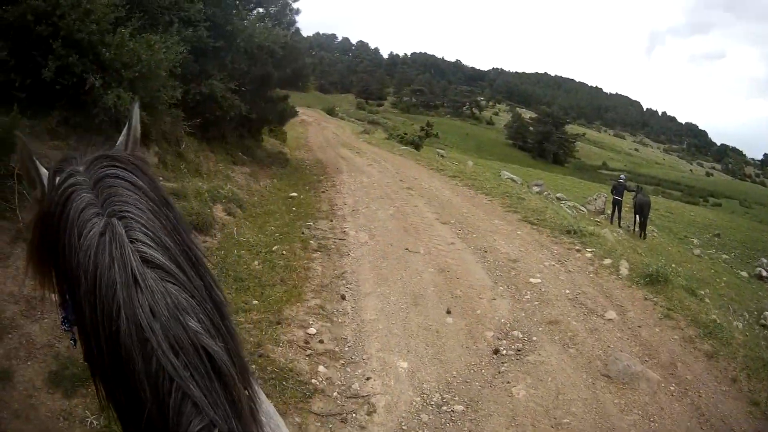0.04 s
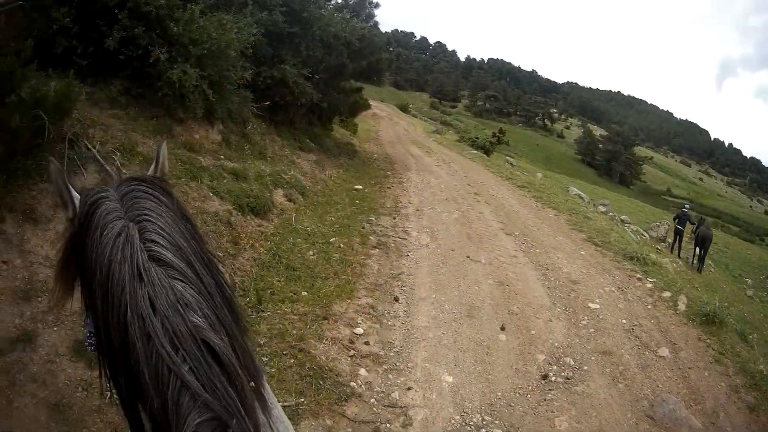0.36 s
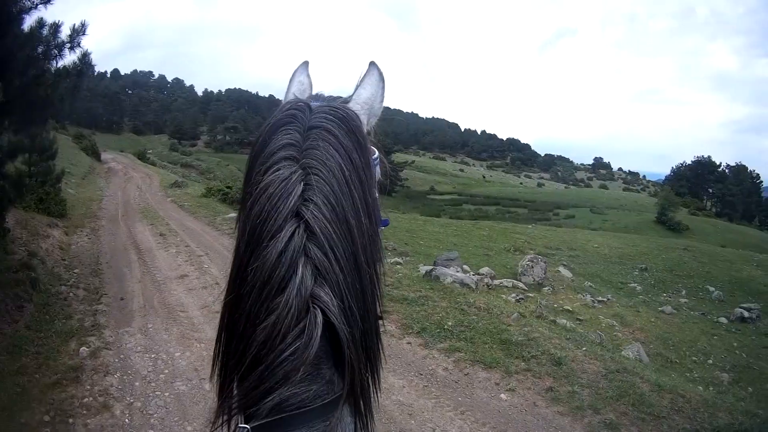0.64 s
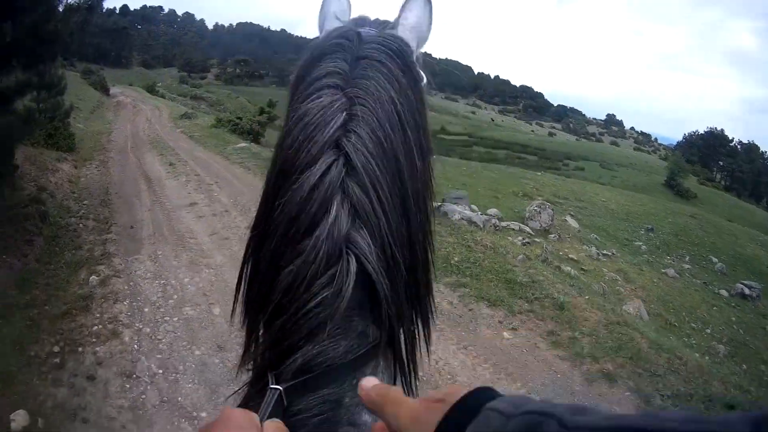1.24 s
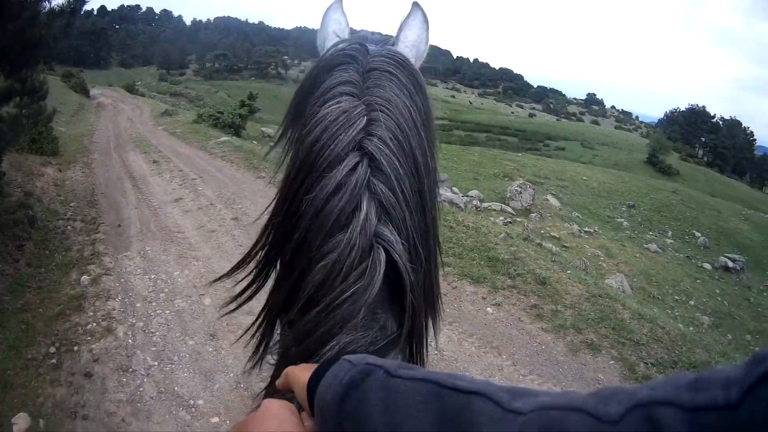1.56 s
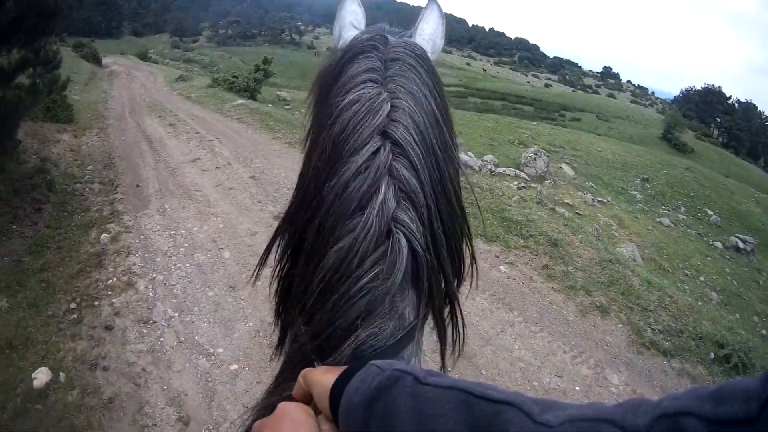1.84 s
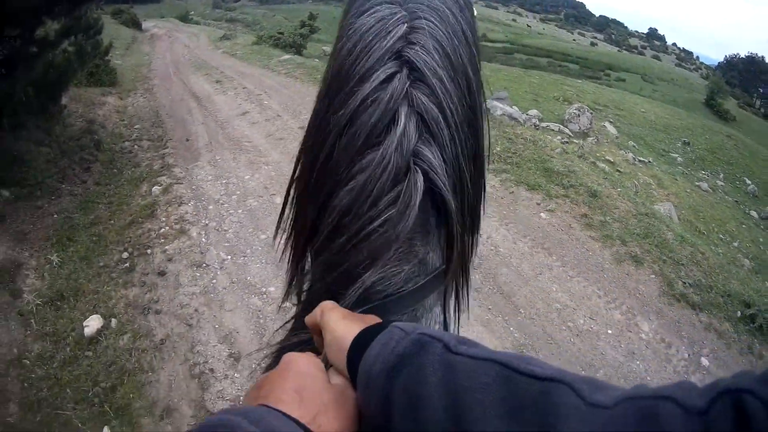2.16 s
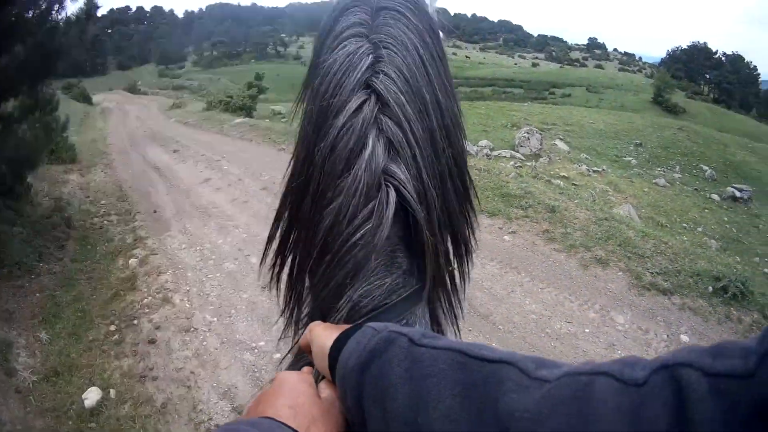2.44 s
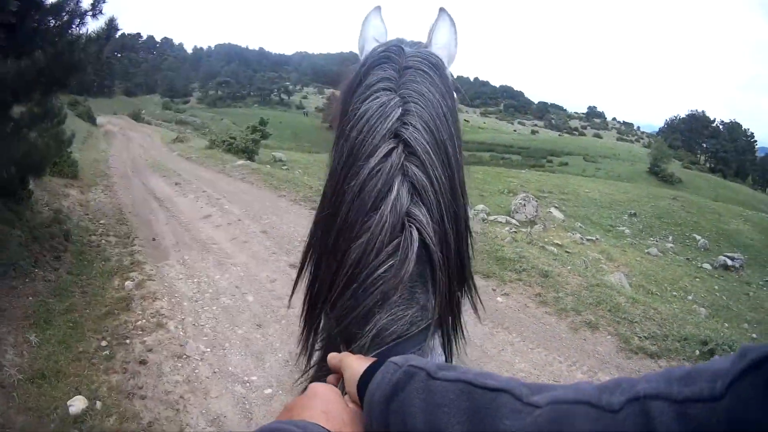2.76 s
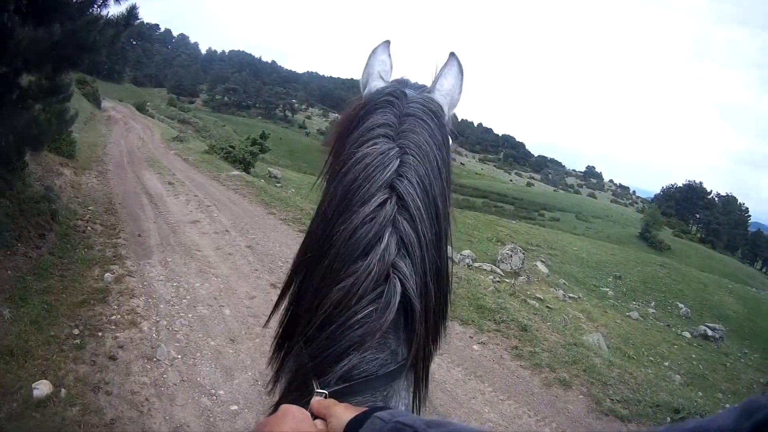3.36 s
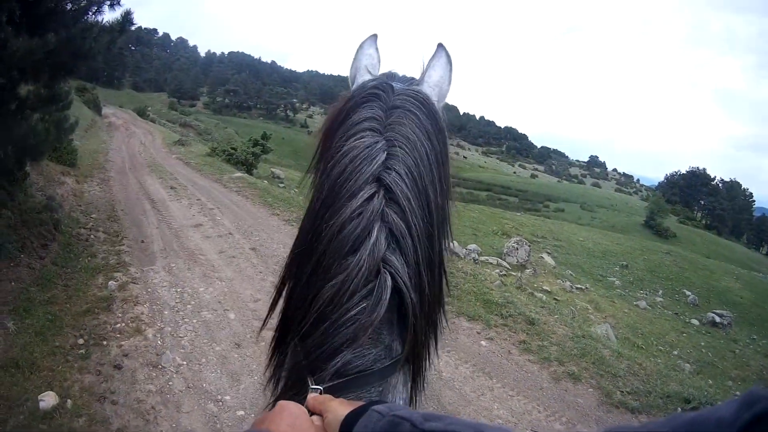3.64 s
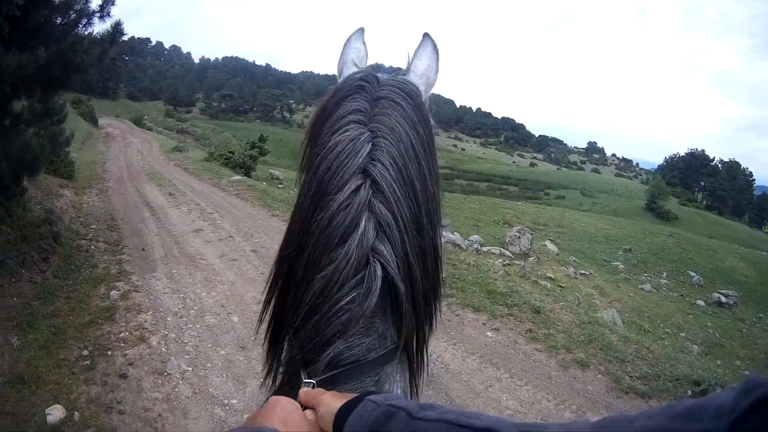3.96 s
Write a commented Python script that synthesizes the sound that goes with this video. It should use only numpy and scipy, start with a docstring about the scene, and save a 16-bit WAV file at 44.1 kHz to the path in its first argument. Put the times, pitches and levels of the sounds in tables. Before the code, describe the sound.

A horse whinnies twice close by, over soft hoof thumps and faint hiss.

```python
"""An open hillside, heard from the saddle, the horse's head just ahead of the camera microphone.
First, hooves thump dully through the animal's body, over faint air and steady microphone hiss.
At 0.9 s a thin squeal opens a whinny: the high voice quavers in falling arches, turns hoarse
in each dip and gives way to a low grunt in the deepest ones. The slack folds rattle and snap
as it ends, and again as a shorter whinny starts at 3.1 s. The hooves go on underneath."""
import sys
import numpy as np
from scipy import signal
from scipy.fft import rfft, irfft
from scipy.io import wavfile
from scipy.ndimage import uniform_filter1d

SR = 44100
rng = np.random.default_rng(int(sys.argv[2]) if len(sys.argv) > 2 else 0)


def dump_mix(stems):
    """Bounce the given channels to the path in sys.argv[1] as a 16-bit WAV at rate SR."""
    frames = np.atleast_2d(stems).T  # one column per channel
    limited = np.clip(frames, -1, 1)  # hard clip at full scale
    pcm = np.round(limited * 32767).astype(np.int16)
    wavfile.write(sys.argv[1], SR, pcm)


N = 176400
TIME = np.arange(N) / SR
# ringing peaks and notches of the rasp (f/Hz, gain/dB)
RASP_RING = [(200, -6.5), (400, -8.5), (560, -28), (750, -18.5), (1060, -6.5), (1280, 3), (1480, -8),
             (1640, -2.5), (1860, -10), (2080, 6), (2170, -3.5), (2270, 1.5), (2440, -28), (2850, -16),
             (3110, -8.5), (3350, -17.5), (3600, -31), (4000, -27.5), (6000, -56)]
LOW_THROAT_HZ = (377, 230)  # centre, width


def whinny(quavers, tone, bright, rasp, crest_hoarseness, edge_db):
    """The folds sing a high note whose overtones dissolve into turbulence as it sinks, over a ringing rasp."""
    # throat and nose as the overtones meet them (f/Hz, gain/dB)
    tract = [(600, 15.5), (800, 2.5), (1020, -3.5), (1230, -0.5), (1640, -11.5), (1820, -32), (2080, -14.5),
             (2260, -6), (2390, -30), (2500, -31), (2850, -40), (3050, -19.5), (3350, -30), (3580, -28),
             (3900, -41.5)]
    # throat resonances under turbulence (f/Hz, gain/dB)
    hoarse_throat = [(120, -26), (260, -5.5), (400, 2.5), (560, 4), (700, -8), (880, -2.5), (1060, 5),
                     (1170, 4.5), (1290, 14), (1470, -9.5), (1640, -10.5), (1830, -48), (2500, -43)]
    clear_hz, hoarse_hz = 545, 370
    hz, dip = quaver(quavers)
    slack = np.maximum(clear_hz - hz, 0) / (clear_hz - hoarse_hz)
    hoarse = np.clip(crest_hoarseness + .19 * dip + slack, 0, .9)  # share of turbulence
    wander = .004 * walk(30)
    jitter = (.005 + .028 * hoarse ** 2) * walk(165.7)
    phase = 2 * np.pi * np.cumsum(hz * (1 + wander + jitter)) / SR

    def edged(resonances):
        return [(f, db + edge_db * (f > 2600)) for f, db in resonances]

    def overtone(k):
        gain = gain_at(k * hz, edged(tract)) * undb(2 * walk(54)) * np.sqrt(2 * (1 - hoarse))
        return gain * np.sin(k * phase + rng.uniform(0, 2 * np.pi))

    def puffs():
        """Breath pulsed by the folds."""
        return rng.standard_normal(N) * (1 + .84 * np.cos(phase)) * undb(.7 * walk(110))

    shimmer_db = 1.1 * (1 + 2 * hoarse) * walk(68.4)
    fundamental = np.sin(phase) * undb(1 + shimmer_db) * np.sqrt(2 - .8 * hoarse ** 2)
    second = overtone(2) * undb(1)
    upper = sum(overtone(k) for k in range(3, 9)) * undb(7)
    # the high voice catches and drops out for a moment
    catch = undb(-18 * sum(np.exp(-((TIME - at) / .016) ** 4) for at in (1.472, 1.588)))
    turbulence = colour(puffs(), hoarse_throat) * undb(3.5) * np.sqrt(hoarse)
    ringing = colour(puffs(), edged(RASP_RING)) * undb(1)
    growl = band_noise(*LOW_THROAT_HZ) * dip * undb(-1.5)
    return (catch * fundamental * envelope(tone)
            + (catch * second + turbulence) * envelope(bright)
            + (catch * upper + ringing + growl) * envelope(rasp))


def quaver(rows):
    """The pitch arches from dip to dip; returns f/Hz and the depth into a dip, 0-1."""
    start, low, crest = np.array(rows).T
    place = np.interp(TIME, start, np.arange(len(start)))
    k = np.minimum(place.astype(int), len(start) - 2)
    arch = np.abs(np.sin(np.pi * (place - k) ** 1.02)) ** .88
    rise = crest[:-1] - (low[:-1] + low[1:]) / 2
    hz = np.interp(TIME, start, low) + rise[k] * arch
    return uniform_filter1d(hz, size=400), (1 - arch) ** 2


def calls():
    """Two whinnies close to the microphone, the second hoarser and with more edge."""
    # pitch arches; the last row closes the call (start t/s, start f/Hz, mid-arch f/Hz)
    first = [(0.906, 406, 549.2), (1.006, 580.4, 590.8), (1.13, 609.8, 624.5), (1.27, 591.2, 607.8),
             (1.36, 583.5, 633), (1.475, 571.5, 606), (1.592, 570.8, 610.7), (1.711, 540.7, 614),
             (1.835, 490, 602), (1.956, 506.7, 598.8), (2.076, 515.8, 589.2), (2.2, 473.5, 575.8),
             (2.327, 409.1, 554.8), (2.451, 361.5, 526.7), (2.59, 329.3, 427), (2.74, 235.8, 237.5)]
    second = [(3.171, 420.2, 529.6), (3.26, 566.8, 609.3), (3.354, 581.5, 643), (3.471, 453, 589),
              (3.596, 487, 570.2), (3.722, 359.6, 542.3), (3.85, 388, 495), (3.98, 338.2, 334),
              (4.05, 256, 261)]
    # fundamental, per call (t/s, level/dB)
    tone = [
        [(0.91, -43.5), (0.94, -53), (1.42, -46.5), (1.5, -48.5), (1.656, -49), (1.688, -39.5), (1.738, -39),
         (1.775, -47.5), (1.812, -37), (1.838, -50), (1.872, -38), (2.03, -42.5), (2.11, -45.5), (2.17, -41.5),
         (2.224, -49), (2.292, -38.5), (2.34, -50.5), (2.412, -43.5), (2.45, -46), (2.52, -47.5), (2.58, -52.5),
         (2.62, -50.5), (2.67, -49.5), (2.71, -54)],
        [(3.19, -57), (3.212, -55), (3.26, -44), (3.28, -55.5), (3.342, -46), (3.364, -54), (3.448, -43),
         (3.51, -46.5), (3.565, -44), (3.605, -50.5), (3.69, -43), (3.73, -49), (3.795, -42), (3.86, -50),
         (3.922, -45.5), (3.97, -50.5), (4.0, -53)],
    ]
    # second harmonic and turbulence, per call (t/s, level/dB)
    bright = [
        [(0.91, -55), (0.966, -52.5), (1.175, -42.5), (1.19, -53), (1.215, -40.5), (1.295, -40.5), (1.39, -45),
         (1.412, -38.5), (1.442, -36.5), (1.485, -46.5), (1.528, -40.5), (1.555, -37.5), (1.575, -39.5),
         (1.622, -44), (1.64, -39), (1.68, -37.5), (1.7, -47), (1.756, -43), (1.785, -35.5), (1.81, -43.5),
         (1.94, -41.5), (1.974, -45.5), (2.072, -43.5), (2.152, -57), (2.175, -49), (2.382, -56),
         (2.418, -52.5), (2.504, -58.5), (2.556, -47), (2.58, -65), (2.678, -58), (2.74, -78)],
        [(3.16, -51.5), (3.19, -50), (3.232, -50.5), (3.248, -42.5), (3.284, -57), (3.302, -49.5), (3.348, -48),
         (3.364, -55), (3.4, -43), (3.49, -46.5), (3.51, -49), (3.542, -45), (3.585, -43.5), (3.618, -55.5),
         (3.68, -45), (3.754, -55.5), (3.802, -45), (3.864, -54.5), (3.885, -49.5), (3.948, -51.5), (3.98, -62)],
    ]
    # upper harmonics, ringing rasp and growl, per call (t/s, level/dB)
    rasp = [
        [(0.92, -74), (1.0, -63), (1.1, -53), (1.288, -49.5), (1.38, -53), (1.46, -47.5), (1.57, -46),
         (1.754, -51.5), (1.8, -45.5), (1.872, -50.5), (1.93, -47), (2.114, -55), (2.426, -61), (2.482, -67.5),
         (2.535, -55.5), (2.58, -83), (2.65, -66.5), (2.76, -76)],
        [(3.1, -64), (3.17, -68.5), (3.244, -53.5), (3.285, -56), (3.32, -53), (3.568, -53), (3.6, -58),
         (3.685, -52.5), (3.744, -62.5), (3.8, -54.5), (3.85, -66), (3.926, -58), (4.0, -73)],
    ]
    return (whinny(first, tone[0], bright[0], rasp[0], crest_hoarseness=.12, edge_db=-2)
            + whinny(second, tone[1], bright[1], rasp[1], crest_hoarseness=.17, edge_db=3))


def grunts():
    """The low voice takes over in the dips, gliding about an octave under the high one."""
    # single grunts (centre t/s, length/s, f/Hz, glide/(Hz/s), level/dB)
    low_notes = [(1.462, 0.042, 327, -3000, -50.5), (1.588, 0.039, 295, 698, -46.5),
                 (1.836, 0.048, 280.5, 0, -56), (2.202, .04, 284.2, -6, -50.5),
                 (2.328, 0.06, 245.8, 997, -44), (2.464, 0.046, 232.5, 812, -44),
                 (2.592, 0.071, 206.2, -1000, -49), (2.666, 0.069, 203.8, -400, -46.5),
                 (2.724, 0.042, 159, -900, -52.5), (3.146, 0.097, 181.5, 701, -50),
                 (3.208, 0.076, 265, 1500, -40), (3.481, 0.03, 291, -5, -52),
                 (3.604, 0.054, 268.5, 501, -41), (3.732, 0.066, 250.4, 5, -50),
                 (3.835, 0.05, 229.4, -1400, -41.5), (3.882, 0.058, 222.2, 1003, -41),
                 (3.969, 0.048, 175.4, -2000, -48)]
    jitter, shimmer = 1 + .05 * walk(88), undb(1.5 * walk(120))
    out = np.zeros(N)
    for at, length, hz, glide, db in low_notes:
        near = np.abs(TIME - at) < length
        offset = TIME[near] - at
        phase = 2 * np.pi * np.cumsum((hz + glide * offset) * jitter[near]) / SR
        voice = sum(undb(-8 * k) * np.sin((k + 1) * phase) for k in range(4))
        out[near] += undb(db) * np.exp(-6 * (offset / length) ** 2) * voice
    return np.sqrt(2) * out * shimmer


def rattle():
    """The slack folds flap loosely, in uneven puffs that ring the low throat."""
    # spells of flapping (start t/s, end t/s, level/dB)
    spells = [(2.556, 2.75, -50.5), (3.094, 3.19, -52.5)]
    flaps_per_s, decay_s = 60, .006
    flaps = np.zeros(N)
    for start, end, db in spells:
        for at in np.arange(start, end, 1 / flaps_per_s):
            age = np.maximum(TIME - at - rng.uniform(-.5, .5) / flaps_per_s, 0) / decay_s
            flaps += undb(db) * 2 * np.sqrt(age) * np.exp(-age)
    return flaps * band_noise(*LOW_THROAT_HZ)


def creaks():
    """Lone snaps of the slack folds ring briefly, coloured like the rasp."""
    # snaps (t/s, level/dB)
    snaps = [(2.636, -51), (3.114, -52), (3.132, -48), (3.149, -50), (3.175, -59)]
    bursts = sum(undb(db) * (TIME >= at) * np.exp(-np.abs(TIME - at) / .002) for at, db in snaps)
    return bursts * colour(rng.standard_normal(N), RASP_RING)


def squeal():
    """A thin whistle rises as the folds tighten; its octave comes in near the top."""
    # course of the whistle (t/s, f/Hz, level/dB)
    course = [(.875, 1188, -79), (.9, 1282, -59), (.94, 1570, -63), (.98, 1772, -64.5), (1.21, 1787, -64),
              (1.3, 1730, -72)]
    hz = curve([(at, f) for at, f, _ in course]) * (1 + .022 * walk(150))
    phase = 2 * np.pi * np.cumsum(hz) / SR
    octave = (hz / hz.max()) ** 12 * np.sin(2 * phase) * undb(-3.5 + 3 * walk(90))
    return np.sqrt(2) * (np.sin(phase) + octave) * envelope([(at, db) for at, _, db in course])


def hooves():
    """Each step reaches the microphone through the body as a soft thump, with a dull rustle of tack."""
    # hoof falls (t/s, level/dB)
    steps = [(0.058, -39), (0.276, -52), (0.427, -46.5), (0.632, -52.5), (0.961, -43), (1.085, -39),
             (1.138, -42.5), (1.49, -43), (1.631, -50), (1.871, -45), (2.002, -42), (2.219, -49.5),
             (2.503, -45), (2.995, -44), (3.504, -41)]
    # dull ring of a thump (f/Hz, level/dB, decay/s)
    modes = [(25, 1, 0.028), (41, 3.5, 0.019), (63.7, -6.5, 0.014)]
    # spectrum of the tack (f/Hz, gain/dB)
    tack = [(40, -39), (90, 19), (150, -4), (300, -10), (900, -26), (4000, -68)]
    rise_s, rustle_decay_s = .019, .087
    rustle = colour(rng.standard_normal(N), tack) * undb(-18)
    out = np.zeros(N)
    for at, db in steps:
        age = np.maximum(TIME - at, 0)
        detune = 1 + .05 * rng.standard_normal()
        ring = sum(undb(mode_db) * np.exp(-age / decay) * np.sin(2 * np.pi * hz * detune * age)
                   for hz, mode_db, decay in modes)
        onset = 1 - np.exp(-(age / rise_s) ** 2)
        out += undb(db) * onset * (undb(11.5) * ring + rustle * np.exp(-age / rustle_decay_s))
    return out


def hillside():
    """Low, gently swelling air and the even hiss of the microphone."""
    # spectrum of the open air (f/Hz, gain/dB)
    open_air = [(20, 3.5), (45, -4.5), (90, -10.5), (160, -11), (300, -15.5), (500, -20.5), (900, -25),
                (2000, -32), (4000, -37.5), (9000, -41.5)]
    air = colour(rng.standard_normal(N), open_air) * undb(-57.5 + 3 * walk(2))
    hiss = undb(-66) * rng.standard_normal(N)
    return air + hiss


def undb(db):
    return 10 ** (np.asarray(db) / 20)


def unit(x):
    return x / np.sqrt(np.mean(x ** 2))


def curve(rows):
    """Join (t/s, value) rows by straight lines."""
    return np.interp(TIME, *np.array(rows).T)


def envelope(rows, fade_s=.025):
    """Gain from (t/s, level/dB) rows, faded to silence at both ends."""
    fade_in = np.clip((TIME - rows[0][0]) / fade_s, 0, 1)
    fade_out = np.clip((rows[-1][0] - TIME) / fade_s + 1, 0, 1)
    return undb(curve(rows)) * fade_in * fade_out


def gain_at(hz, points):
    """Gain of a (f/Hz, gain/dB) spectrum at the given frequencies."""
    f, db = np.array(points).T
    return undb(np.interp(np.log(hz + 1), np.log(f), db))


def colour(x, points):
    """Filter by a (f/Hz, gain/dB) spectrum, to rms 1."""
    return unit(irfft(rfft(x) * gain_at(np.arange(N // 2 + 1) * SR / N, points), N))


def band_noise(hz, width_hz):
    """Noise in one bell-shaped band, rms 1."""
    f = np.arange(N // 2 + 1) * SR / N
    bell = np.exp(-.5 * ((f - hz) / (width_hz / 2)) ** 2)
    return unit(irfft(rfft(rng.standard_normal(N)) * bell, N))


def walk(rate_hz):
    """Smooth random drift up to about this rate, rms 1."""
    return band_noise(0, 2 * rate_hz)


def scene():
    """The horse close up, the hillside behind, in mono."""
    return (calls() + grunts() + rattle() + creaks() + squeal() + hooves() + hillside())[None]


def record(dry):
    """The camera cuts the top steeply."""
    top_hz = 15750
    return signal.sosfilt(signal.ellip(10, .2, 70, top_hz, fs=SR, output="sos"), dry)


dry = scene()
out = record(dry)
dump_mix(out)
```